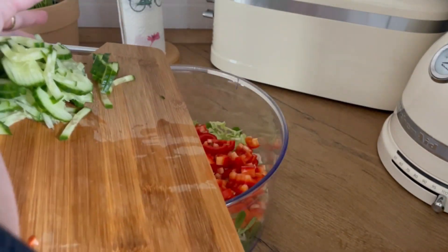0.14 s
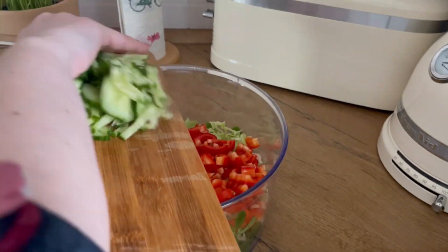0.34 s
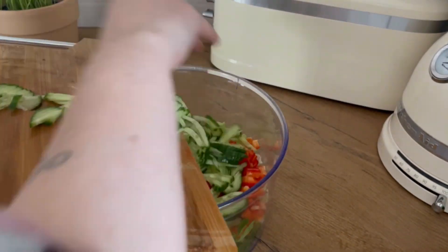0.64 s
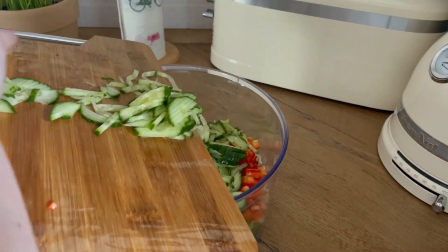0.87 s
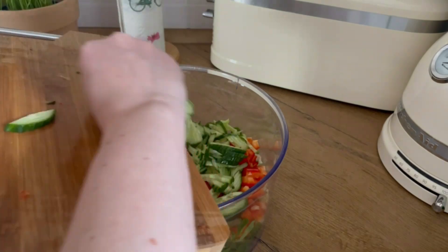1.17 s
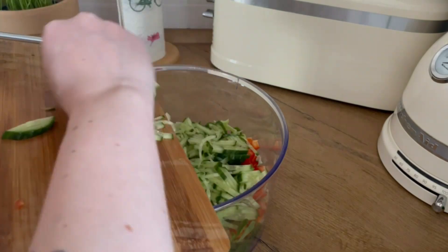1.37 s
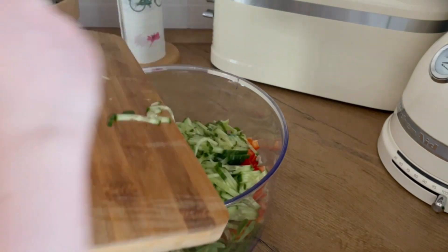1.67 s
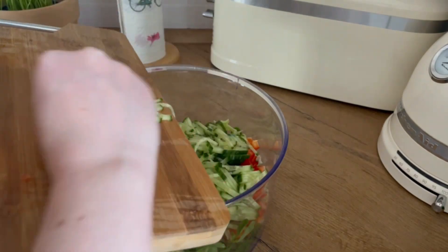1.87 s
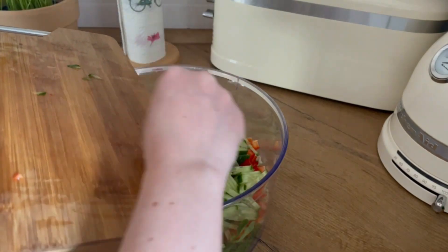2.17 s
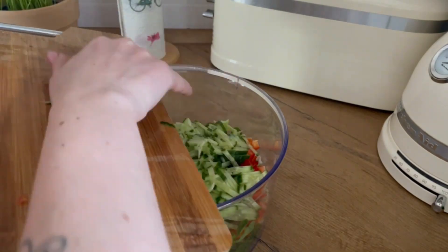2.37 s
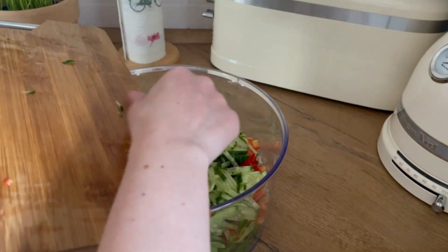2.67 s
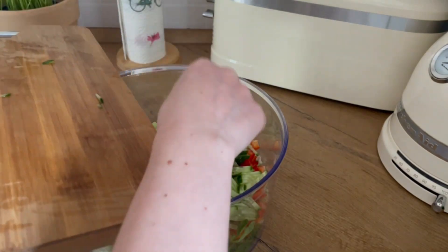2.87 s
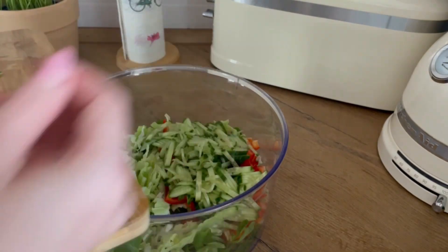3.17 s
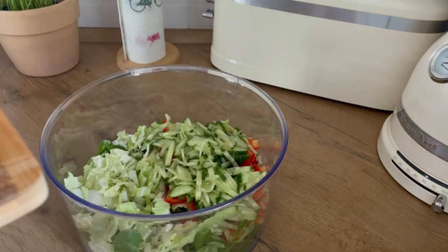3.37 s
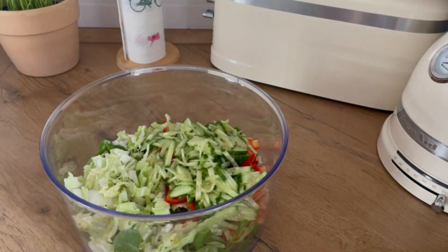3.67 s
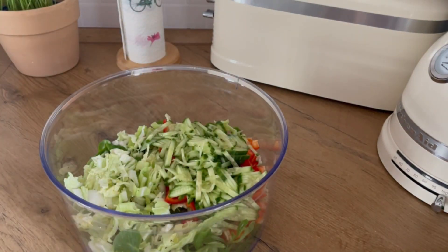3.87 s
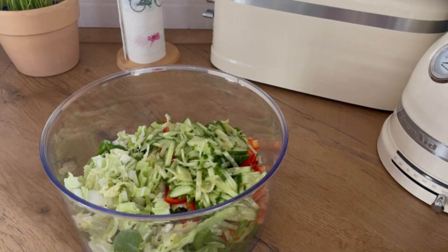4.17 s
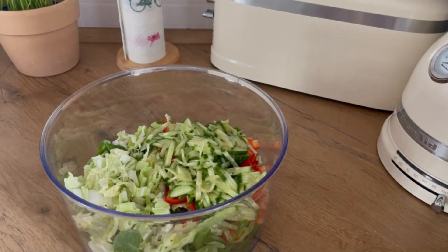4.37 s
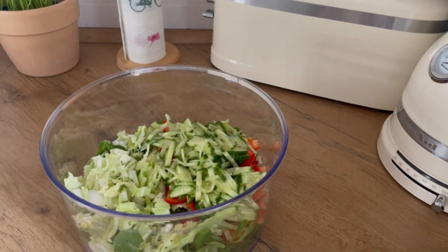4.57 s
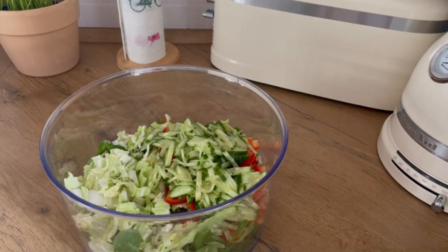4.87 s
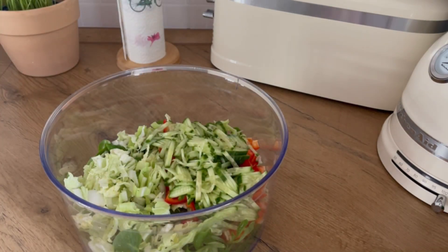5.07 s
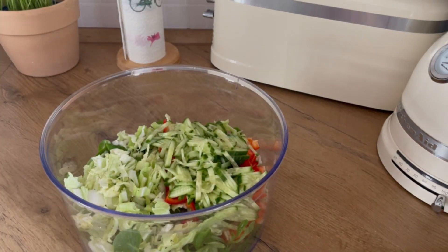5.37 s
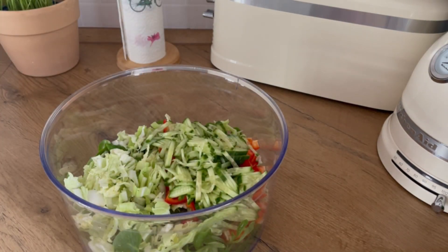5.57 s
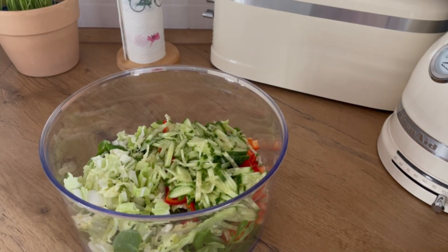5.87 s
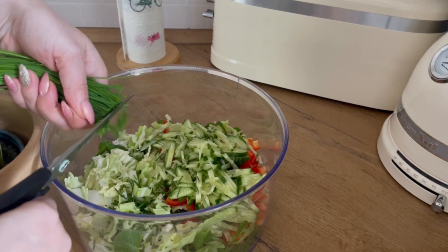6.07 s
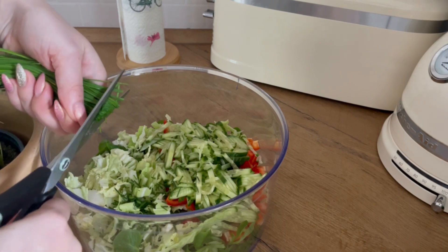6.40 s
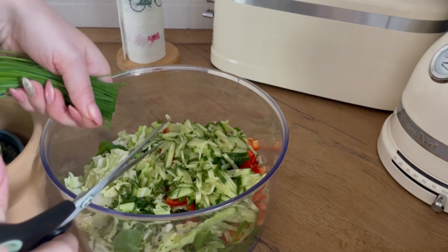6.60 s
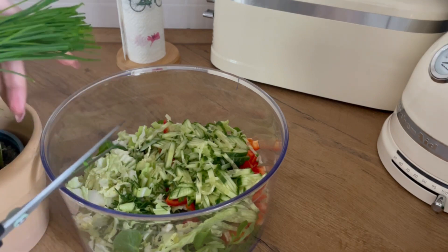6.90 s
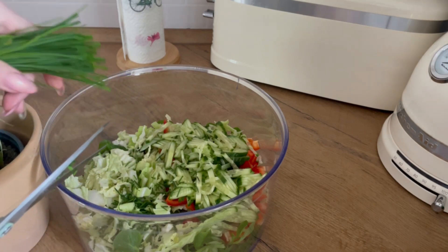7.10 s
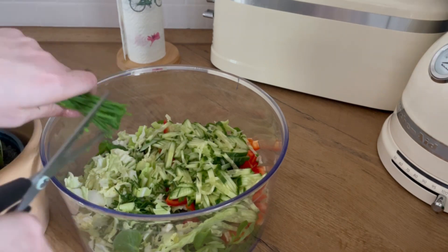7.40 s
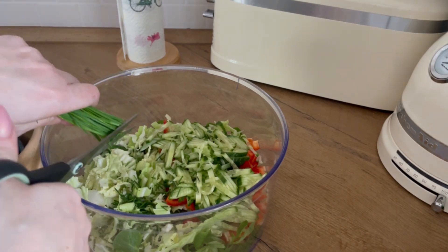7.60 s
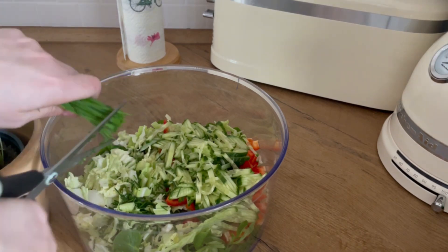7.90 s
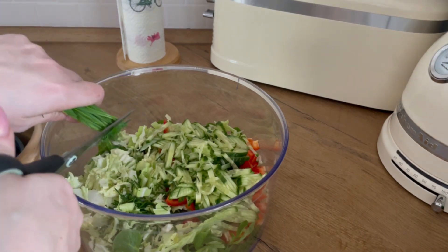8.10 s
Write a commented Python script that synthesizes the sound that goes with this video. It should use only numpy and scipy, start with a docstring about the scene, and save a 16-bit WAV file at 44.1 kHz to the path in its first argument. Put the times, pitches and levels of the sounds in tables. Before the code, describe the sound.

A quiet kitchen, miked closely with slight short reverberation, over soft room noise and a low, faintly wavering appliance hum. At 0 s a wooden board knocks on a plastic bowl, with a stronger hollow double knock near 0.35 s. Until about 2.2 s a hand scrapes over the board in uneven short, dry, raspy strokes with light taps; firmer swipes come at 1.75 and 2.15 s. Another clear knock sounds at 2.7 s, then faint rustles around 3.2-3.4 s. After a pause, the board lands at 4.6 s in a loud, rapid woody rattle, slides, tips at 4.8 s and settles by 5 s. Soft rustles follow. At 5.92 s an abrupt cut slightly changes the hum. Scissors snip chives at about 6.05, 6.47, 7.63 and 8.1 s: bright metallic touch, crisp crunch and snaps, then a reopening click with a tiny squeak. The bunch rustles very quietly between cuts.

```python
"""In a quiet kitchen with humming appliances, a hand scrapes chopped vegetables off a wooden board.
The board knocks on a plastic bowl and is put down on the counter; after an edit, scissors snip chives.
Scrapes, rustles and cuts are dense random slips; knocks and snaps are a click with a dying shower of contacts.
Both ring a filter shaped like the object. The background is shaped noise, steady tones and wavering whines."""
import sys
import numpy as np
from scipy import signal
from scipy.io import wavfile
from scipy.ndimage import uniform_filter1d

SR = 44100
rng = np.random.default_rng(int(sys.argv[2]) if len(sys.argv) > 2 else 0)


def store_wav(level_fs):
    """Save 16-bit WAV to argv[1]."""
    pcm = np.round(np.clip(np.atleast_2d(level_fs), -1, 1) * 32767)
    wavfile.write(sys.argv[1], SR, pcm.T.astype(np.int16))


N = 363825
EDIT_S = 5.921  # the second part of the scene starts here

# Room noise, one colour table for each part: (frequency [Hz], density [dB per Hz], relative)
AIR_COLOURS = [(18, -90), (30, -66), (81, -43), (95, -8.5), (117, -7), (148, -25), (243, -15.5),
               (359, -21.5), (443, -19), (874, -25.5), (1260, -28.5), (2240, -38.5), (2990, -42),
               (4910, -50), (15500, -54.5)], [(18, -82), (30, -35.5), (85, -31), (100, -9.5), (123, -5),
               (148, -19.5), (249, -8), (292, -23.5), (399, -11.5), (532, -21), (673, -17), (1080, -24),
               (1870, -29), (2300, -34.5), (15500, -57.5)]
# Loudness of the room noise: (first part [dB rms], second part [dB rms]), before the bass roll-off
AIR_LEVELS_DB = -63.5, -62.5
# Motor tones: (frequency [Hz], first part [dB rms], second part [dB rms], sign at the in-step moment [+1 or -1]),
# levels before the bass roll-off
MOTOR_TONES = [(118.94, -61, -61, 1), (115.36, -64, -120, -1), (135.5, -120, -66, -1),
               (120.8, -120, -72, 1)]
# Moments when every tone is at a positive or negative peak: (first part [s], second part [s])
IN_STEP_S = 3.4, 6.47
# Wavering whines: (frequency [Hz], first part [dB rms], second part [dB rms], rms wander [Hz]),
# levels before the bass roll-off
WHINES = [(169.7, -77, -72.5, 2.8), (198, -70.5, -70.5, 3.5), (239.6, -70, -72, 1.1),
          (405, -77, -81.5, 3.4), (450, -74, -74.5, 4.2), (1874, -120, -80, 2.7), (14326, -101, -120, 4)]

# Faint rustles of cloth or hands: (loudest at [s], rise [s], hold [s], fall [s], level [dB], brightness [dB])
RUSTLES = [(3.207, .08, 0.045, 0.098, -67, 4), (3.376, 0.14, 0, 0.14, -63.5, -4.5),
           (5.186, 0.01, 0.0032, 0.074, -63, 0), (5.41, .03, 0.085, .15, -82, 4.5),
           (5.846, 0.019, 0, .11, -68.5, -14), (8.015, .04, .02, .04, -70, -14)]
# Colour of the rustles: (frequency [Hz], density [dB per Hz], relative)
RUSTLE_COLOUR = [(590, -22), (1000, 1), (1370, -7), (1500, -9), (2040, -5), (3760, -7), (15000, -29)]
# Bands of the rustles: (low edge [Hz], high edge [Hz], level [dB],
# share of pressure [0-1], share of brightness [0-1], share of weight [0-1])
RUSTLE_BANDS = [(1800, 6600, -1, 0.98, 0, 0), (7000, 16000, -7.5, .9, 1, 0)]

# The scissor joint squeaks: (start [s], length [s], first pitch [Hz], last pitch [Hz], level [dB])
SQUEAKS = [(6.13, 0.024, 3900, 3700, -59.5), (6.132, .025, 2070, 1940, -63),
           (6.558, 0.024, 2930, 1510, -57), (7.707, .03, 3000, 1800, -66), (8.188, 0.034, 2980, 1780, -65)]
# Snips: (blades slide in [s], touch [s], bite [s], cut through [s], reopen [s],
# touch [dB], bite [dB], cut [dB], reopening [dB], brightness [dB])
SNIPS = [(5.959, 6.0227, 6.051, 6.074, 6.1235, -39, -53, -45, -58.5, 1),
         (6.4, 6.4557, 6.463, 6.492, 6.554, -44, -59, -45, -57, 4),
         (7.601, 7.6213, 7.638, 7.652, 7.6984, -39.5, -54, -46, -55, -4),
         (8.031, 8.0606, 8.092, 8.143, 8.1848, -40, -55, -53, -57, -2)]
# The bunch of chives rustles in the hand:
# (loudest at [s], rise [s], hold [s], fall [s], level [dB], brightness [dB])
CHIVES = [(6.306, 0.061, 0.011, 0.055, -75.5, 3.5), (6.356, 0.055, 0, 0.047, -73.5, 6),
          (6.611, .04, .045, .06, -67, -2), (6.679, 0.021, 0.0041, 0.22, -76, -7),
          (7.077, 0.028, 0.0098, .025, -75.5, 0.5), (7.197, .3, 0, .1, -84, 1),
          (7.289, 0.19, 0.05, 0.052, -77.5, 4), (7.4, .1, 0.0032, .1, -89, 6),
          (7.482, 0.048, .026, .15, -79, 1.5), (7.768, .02, 0, .06, -82, -5), (7.88, .2, 0, 0.23, -94, 5),
          (7.971, .005, 0.02, 0.027, -75.5, -1)]
# Stalks snap, with small ticks nearby: (time [s], loudest 4 ms [dB rms], treble tilt [dB per octave])
SNAPS = [(2.9667, -68, -10.5), (3.5049, -61, -6), (3.8237, -59, -12), (6.0514, -44, -3.5),
         (6.0559, -36.5, -4), (6.0704, -42.5, -5), (6.0736, -24, -1), (6.3001, -62, -9),
         (6.4742, -33.5, -2), (6.4854, -29.5, 1), (6.4906, -34.5, -4), (6.6782, -59, -5),
         (6.8663, -61.5, -4), (7.2774, -57, 1.5), (7.3033, -63, -5), (7.3193, -58, -4), (7.4814, -67, 0.5),
         (7.4939, -62, -1), (7.5058, -60, -1), (7.65, -38.5, -5), (7.7677, -58.5, -11), (7.9703, -59, -12),
         (8.0341, -57, -12.5), (8.091, -41, -1), (8.1054, -46.5, -6), (8.1199, -36.5, -5.5),
         (8.1394, -46, -5)]
# Colour of the cuts: (frequency [Hz], density [dB per Hz], relative)
CUT_COLOUR = [(290, -41), (500, -20.5), (935, -9.5), (1320, -11.5), (1830, -11.5), (1960, -10),
              (4600, -5.5), (7360, -2.5), (10500, 3.5), (12500, 5), (15500, 11.5)]
# Resonances of the blades: (frequency [Hz], width [Hz], height [dB])
BLADE_RINGS = [(2130, 100, -25), (3890, 100, -7.5), (4900, 1060, -3), (8740, 4000, -0.5),
               (12300, 2900, -10.5)]
# Slide, fizz and crunch of a cut: (low edge [Hz], high edge [Hz], level [dB],
# share of pressure [0-1], share of brightness [0-1], share of weight [0-1])
CUT_BANDS = [(3300, 6650, 0.5, 1, 0.2, 0), (6840, 13500, 1.5, 0.87, 0.9, 0), (900, 2570, -6, 0.68, 0, 1)]
# Swell of the blades touching: (rise [s], hold [s], fall [s])
TOUCH_SHAPE = 0.0017, 0.0011, 0.029
# Swell of the blades reopening: (rise [s], hold [s], fall [s])
REOPENING_SHAPE = 0.0034, 0.0087, 0.054

# The board lands, rattles and settles on the counter:
# (time [s], loudest 4 ms [dB rms], treble tilt [dB per octave], time to die by 60 dB [s], thud [dB])
LANDINGS = [(4.5895, -25.5, 1.5, 0.053, -5.5), (4.5925, -22.5, 0, 0.042, -2.5),
            (4.602, -32, 3.5, 0.037, 3.5), (4.6085, -24.5, 1, 0.059, 0.5), (4.6125, -25, 2, 0.025, -1),
            (4.621, -33, -4, 0.014, 0), (4.632, -41, -3, 0.026, -2), (4.6415, -30, -0.5, 0.034, -9.5),
            (4.646, -27, -1, 0.038, -1), (4.659, -36.5, -9, 0.037, -7), (4.699, -32, -1.5, 0.039, 3),
            (4.711, -43, -5.5, 0.037, 4), (4.8165, -33, 1.5, .025, 15), (4.9, -51.5, -2, 0.044, 5)]
# Colour of the board on the counter: (frequency [Hz], density [dB per Hz], relative)
LANDING_COLOUR = [(59, -40.5), (100, -6.5), (330, -1), (391, -14), (492, 0), (633, -14), (718, 1),
                  (1110, -3), (1370, -9.5), (1840, -6), (2370, -9.5), (3840, -13), (15000, -58.5)]
# Resonances of the board on the counter: (frequency [Hz], width [Hz], height [dB])
LANDING_RINGS = [(136, 11.4, 9.5), (249, 21.6, 10.5), (328, 22, 9.5), (434, 16, 7), (497, 29, 7),
                 (820, 76, -1), (1096, 87, 5), (1760, 170, -0.5), (1993, 100, 3.5), (2730, 54, 0),
                 (3085, 33, 9.5), (3810, 113, 2.5), (4530, 140, -5), (5110, 120, -7.5), (6320, 90, -0.5)]
# The board slides, tips over and slides to rest:
# (brightness [dB], weight [dB], pressure as a list of (time [s], level [dB]))
SLIDE = [ (-10, -10, [(4.62, -39), (4.662, -38), (4.68, -41)]), (2.5, 0, [(4.68, -44), (4.69, -40),
         (4.81, -52)]), (3.5, -1.5, [(4.815, -43), (4.839, -52), (4.877, -50.5), (4.913, -45.5),
         (5.009, -82)]), ]
# Colour of the sliding board: (frequency [Hz], density [dB per Hz], relative)
SLIDE_COLOUR = [(88, -30.5), (150, -5), (326, 1.5), (561, -6), (668, 2), (966, -16.5), (1110, -14.5),
                (1240, -14), (3280, -19.5), (15500, -42.5)]
# Scrape, hiss and rumble of the slide: (low edge [Hz], high edge [Hz], level [dB],
# share of pressure [0-1], share of brightness [0-1], share of weight [0-1])
SLIDE_BANDS = [(1082, 3960, 0.5, 0.97, 0, 0.037), (4570, 16000, -9.5, 0.91, 1, 0.012),
               (150, 990, 4.5, 0.74, 0, 0.99)]

# The board knocks on the bowl:
# (time [s], loudest 4 ms [dB rms], treble tilt [dB per octave], time to die by 60 dB [s], thud [dB])
KNOCKS = [(.004, -31, 3, 0.03, 16), (.334, -28.5, 3.5, 0.11, -15), (.3395, -17.7, 2.5, .02, -4),
          (.349, -32, 1.5, .02, -4), (.356, -34, 2.5, 0.047, 2), (.364, -28, 4, 0.07, 2),
          (.369, -29, 2.5, 0.04, 8), (.39, -51, 5, 0.04, -9), (.505, -43.5, -3.5, 0.08, -7),
          (.899, -46.5, -6, 0.048, 4), (1.09, -48.5, -8, 0.027, 5), (1.269, -53, -3.5, 0.036, -4),
          (2.299, -36.5, 4, 0.071, 19.5), (2.696, -25.5, 1.8, 0.04, 0.7), (5.892, -51, -1, .02, 4)]
# Colour of the knocks: (frequency [Hz], density [dB per Hz], relative)
KNOCK_COLOUR = [(71, -42.5), (120, -13.5), (220, 2.5), (292, -2.5), (387, -4.5), (981, -1.5), (1470, -13),
                (1910, -17), (2250, -22), (2980, -17.5), (3800, -31.5), (5690, -27.5), (15000, -56)]
# Resonances of the knocks: (frequency [Hz], width [Hz], height [dB])
KNOCK_RINGS = [(244.2, 38, 16.5), (416.5, 30, 2.5), (535, 38, 6.5), (710, 50, 3), (896, 130, 4.5),
               (1017, 30, 5.5), (1100, 58, -7.5), (1584, 60, 1.5), (1900, 200, 9), (2684, 80, -0.5),
               (2930, 140, 3), (3700, 120, 13), (4090, 99, 12)]

# Strokes over the board: (brightness [dB], weight [dB], pressure as a list of (time [s], level [dB]))
STROKES = [ (-1.5, 22, [(0.012, -53), (0.022, -57), (0.037, -53)]), (0, -0.5, [(0.044, -60), (0.088, -67),
           (0.165, -67.5), (0.238, -56), (0.308, -55), (0.328, -56)]), (2, 6.5, [(0.39, -58), (0.442, -60),
           (0.47, -59), (0.496, -61.5), (0.61, -61), (0.69, -74.5), (0.715, -84)]),
           (-8, -10.5, [(0.72, -83), (0.762, -56), (0.786, -68), (0.846, -67), (0.914, -68.5)]),
           (-1, 0.5, [(0.923, -51), (0.943, -63), (0.965, -54), (1.035, -55)]), (4, 4, [(1.04, -54),
           (1.111, -57), (1.207, -56), (1.243, -50.5), (1.257, -65)]), (-5.5, 7, [(1.26, -66), (1.294, -67),
           (1.312, -62), (1.39, -75.5)]), (-4, -9, [(1.4, -55), (1.426, -67), (1.46, -54), (1.476, -58.5),
           (1.51, -51.5), (1.6, -105)]), (-1.5, -6, [(1.751, -47.5), (1.771, -51.5), (1.805, -46),
           (1.841, -55), (1.865, -61)]), (4.5, -0.5, [(1.87, -57), (1.976, -55), (2.04, -99)]),
           (1.5, -12, [(2.13, -47), (2.14, -58), (2.165, -41.5), (2.177, -48.5), (2.213, -77),
           (2.27, -101)]), (-3.5, -6.5, [(2.38, -90), (2.43, -63), (2.496, -59), (2.56, -108)]),
           (-5, 8, [(2.63, -98), (2.646, -82), (2.674, -71), (2.69, -50)]), ]
# Colour of the strokes: (frequency [Hz], density [dB per Hz], relative)
STROKE_COLOUR = [(120, -34.5), (200, -4), (248, -3.5), (363, -12.5), (443, -9), (1220, -9.5), (1330, -11),
                 (2060, -16.5), (3800, -8), (4390, -10), (15000, -19.5)]
# Resonances of the scraped board: (frequency [Hz], width [Hz], height [dB])
STROKE_RINGS = [(242, 20, 5.5), (1350, 75, 7.5), (1630, 130, 4.5), (2750, 150, 7.5), (3123, 110, 11),
                (3775, 88, 6), (4200, 320, -3.5), (5180, 250, 4.5), (6430, 300, 3), (8040, 300, -3.5),
                (9600, 370, -3)]
# Rasp, hiss, fizz, woody body and rumble: (low edge [Hz], high edge [Hz], level [dB],
# share of pressure [0-1], share of brightness [0-1], share of weight [0-1])
STROKE_BANDS = [(2289, 4440, -1, 1, 0, 0.021), (4502, 7600, -3.5, 0.78, 0.68, 0.11),
                (7800, 14500, -5.5, 1, 1, 0.007), (1060, 2400, -2.5, 1, .2, 0.05),
                (150, 890, -4.5, .4, 0.034, 0.73)]
# A stroke lands or catches on the board:
# (time [s], loudest 4 ms [dB rms], treble tilt [dB per octave], time to die by 60 dB [s])
TAPS = [(0.0438, -39.5, 1.5, 0.026), (0.2857, -52, 3, 0.077), (0.7416, -58, -2, 0.047),
        (0.7607, -41.5, 1, 0.018), (0.9221, -30.5, 2.5, 0.032), (0.9642, -46.5, 0.5, 0.087),
        (1.041, -50.5, 2, 0.19), (1.2383, -48, -2.5, 0.072), (1.4, -40.5, 0.5, 0.024),
        (1.4633, -53, -2, 0.062), (1.512, -46, 3.5, 0.036), (1.5497, -59, 5, 0.032),
        (1.7507, -40.5, 1, 0.044), (2.1306, -41, 0, 0.041)]

USUAL_DB = -60  # a middling pressure
QUIET_DB = -30  # how far below its top a swell starts and ends
SLIDE_IN_RISE_S, SLIDE_IN_DB, SLIDE_IN_BRIGHT_DB = 0.012, -73, 3.5
TOUCH_HISS_DB, TOUCH_BRIGHT_DB, TOUCH_TILT_DB = -20, 5.5, -1.5  # hiss against the click
BITE_RISE_S, BITE_RISE_DB = 0.0086, -14  # the bite starts this far below its level
CRUNCH_FALL_S, CRUNCH_WEIGHT_DB = 0.021, 3
SETTLING_DB = -77  # cut stalks fall until the blades reopen
JOINT_CLICK_DB, JOINT_TILT_DB = 9, -5.5  # click against the scrape
REOPENING_BRIGHT_DB, REOPENING_WEIGHT_DB = -4.5, 4
SNAP_T60_S = 0.029


def amp(db):
    """Turns dB into a gain."""
    return 10 ** (np.asarray(db) / 20)


def evened(x):
    """Scales a signal to rms 1."""
    return x / np.sqrt(np.mean(x ** 2) + 1e-20)


def smooth_noise(count, width):
    """Random wandering, averaged over width samples and scaled to rms 1."""
    return evened(uniform_filter1d(rng.standard_normal(count), width))


def read(points, hz):
    """Reads a spectrum table at the frequencies hz, on a logarithmic pitch scale."""
    f, value = np.transpose(points)
    return np.interp(np.log(hz + 1), np.log(f + 1), value)


def add(mix, s, sound):
    """Mixes a sound in at s seconds."""
    part = mix[round(s * SR):][:len(sound)]
    part += sound[:len(part)]


def band(x, lo_hz, hi_hz):
    """Keeps the sound between two frequencies, at rms 1."""
    sos = signal.butter(2, [lo_hz, min(hi_hz, SR / 2.2)], "band", fs=SR, output="sos")
    return evened(signal.sosfilt(sos, x))


def drifting(x, drift_db):
    """The colour wanders in patches as the point of contact moves."""
    z = signal.stft(x, nperseg=256, noverlap=192)[2]
    patches = uniform_filter1d(rng.standard_normal(z.shape[::-1]).T, 5, 0)  # across pitch
    patches = evened(uniform_filter1d(patches, 25, 1))  # across time
    return signal.istft(z * amp(drift_db * patches), nperseg=256, noverlap=192)[1][:len(x)]


def body(colour, rings=(), tilt_db=0, thud_db=0, lag=0, size=8192):
    """Response of a struck object: broad colour with resonance peaks, energy 1; bass comes lag seconds late."""
    hz = np.fft.fftfreq(size, 1 / SR)
    f = np.abs(hz)
    tilt = tilt_db * np.log2(np.clip(f, 150, None) / 2000)
    thud = thud_db / (1 + (f / 500) ** 4)
    peaks = sum(amp(top_db) / (1 + (2 * (f - at) / width) ** 2) for at, width, top_db in rings)
    gain = amp(read(colour, f) + tilt + thud) * (1 + peaks)
    log_gain = np.log(np.maximum(gain, 1e-5 * gain.max()))
    # This phase makes the sound start at once and then die away
    phase = signal.hilbert(log_gain).imag
    # Bending waves in wood travel slower at low pitch
    phase = phase + 2 * np.pi * lag * 400 * np.log(1 + f / 400) * np.sign(hz)
    response = np.fft.ifft(np.exp(log_gain - 1j * phase)).real[:size // 2]
    return response / np.linalg.norm(response)


def uneven_rings(rings, changes_db):
    """Each place or stroke excites the resonances unevenly, so their heights change."""
    return [(hz, width, db + more) for (hz, width, db), more in zip(rings, changes_db)]


def swell(s, rise, hold, fall, db, bright_db, weight_db=0):
    """Pressure that rises to its top at s seconds, holds and falls."""
    rise, hold, fall = np.maximum([rise, hold, fall], 0.001)
    end = s + hold + fall
    pressure = [(s - rise, db + QUIET_DB), (s, db), (s + hold, db), (end, db + QUIET_DB)]
    return bright_db, weight_db, pressure


def friction(moves, colour, rings, bands, grain_db, lump_db, drift_db):
    """Dense slips of uneven size ring the object; each band has its own contacts and follows the pressure."""
    out = np.zeros(N)
    spots_db = drift_db * rng.standard_normal((len(moves), len(rings)))
    for (bright_db, weight_db, pressure), spot in zip(moves, spots_db):
        s, level_db = np.transpose(pressure)
        t = np.arange(s[0], s[-1] + 0.005, 1 / SR)
        response = body(colour, uneven_rings(rings, spot))
        # Pressure varies every few ms
        lumps = uniform_filter1d(rng.standard_normal(len(t)), 150)
        lumps = evened(uniform_filter1d(lumps, 150))
        edges = signal.windows.tukey(len(t), 0.002 * SR / len(t))  # 1 ms fades
        press_db = np.interp(t, s, level_db) - USUAL_DB
        for lo_hz, hi_hz, db, pressed, bright, heavy in bands:
            grains = np.minimum(rng.exponential(1, len(t)), 5)
            slips = rng.standard_normal(len(t)) * amp(grain_db * grains + lump_db * lumps)
            rung = signal.oaconvolve(slips, response)[:len(t)]
            band_db = USUAL_DB + db + pressed * press_db + bright * bright_db + heavy * weight_db
            add(out, s[0], band(drifting(rung, drift_db), lo_hz, hi_hz) * amp(band_db) * edges)
    return out


def blows(events, colour, rings, tail_db, spot_db, lag=0):
    """Each blow is one click and a dying shower of small contacts, ringing the object."""
    out = np.zeros(N)
    t = np.arange(SR // 5) / SR
    showers = rng.standard_normal((len(events), len(t)))
    spots_db = spot_db * rng.standard_normal((len(events), len(rings)))
    for (s, peak_db, tilt_db, t60, *thud_db), shower, spot in zip(events, showers, spots_db):
        onset = np.minimum(t / 0.00028, 1)
        drive = amp(tail_db - 60 * t / max(t60, 0.004)) * shower * onset
        drive[SR // 1200] = 1  # the main contact follows the first touch
        response = body(colour, uneven_rings(rings, spot), tilt_db, *thud_db, lag=lag)
        sound = signal.fftconvolve(drive, response)
        loudest = np.sqrt(uniform_filter1d(sound ** 2, 180).max())  # over 4 ms
        add(out, s, amp(peak_db) * sound / loudest)
    return out


def air(colour, db):
    """Room noise: random short-time spectra with faint drifting patches."""
    frames = N // 256 + 5
    hz = np.fft.rfftfreq(1024, 1 / SR)
    real, imaginary, patches = rng.standard_normal((frames, 513, 3)).T
    patches = uniform_filter1d(patches, 10, 0)  # across pitch
    patches = evened(uniform_filter1d(patches, 12, 1))  # across time
    z = (real + 1j * imaginary) * amp(read(colour, hz)[:, None] + patches)
    noise = signal.istft(z, nperseg=1024, noverlap=768)[1][:N]
    return amp(db) * evened(noise)


def appliances(part):
    """Steady motor tones that beat against each other, and thin whines that waver in pitch."""
    t = np.arange(N) / SR - IN_STEP_S[part]
    out = np.zeros(N)
    for hz, *db, sign in MOTOR_TONES:
        out += sign * amp(db[part]) * np.cos(2 * np.pi * hz * t)
    for hz, *db, width in WHINES:
        pitch = hz + width * smooth_noise(N, 4000)
        out += amp(db[part]) * np.cos(2 * np.pi * np.cumsum(pitch) / SR)
    return np.sqrt(2) * out  # a cosine of rms 1 peaks at the square root of 2


def background():
    """Room noise and appliances, switching to other levels and colours at the edit."""
    first, second = (air(AIR_COLOURS[part], AIR_LEVELS_DB[part]) + appliances(part) for part in (0, 1))
    return np.where(np.arange(N) < EDIT_S * SR, first, second)


def kitchen(x):
    """Short reverberation: sparse echoes of random sign, treble dying sooner."""
    echoes = np.zeros(SR // 2)
    at = np.arange(200, len(echoes) - 20, 20)
    echoes[at + rng.integers(0, 20, len(at))] = rng.choice([-1., 1.], len(at))
    hz, t, z = signal.stft(echoes, SR, nperseg=256)
    t60 = read([(200, 0.44), (2000, 0.13), (12000, 0.13)], hz)  # (frequency [Hz], time to die by 60 dB [s])
    tail = signal.istft(z * amp(-60 * t / t60[:, None]), SR, nperseg=256)[1]
    return signal.oaconvolve(x, tail / np.linalg.norm(tail))[:N]


def rustles():
    """Cloth or hands rub lightly: soft swells of random slips."""
    moves = [swell(*row) for row in RUSTLES]
    return friction(moves, RUSTLE_COLOUR, [], RUSTLE_BANDS, grain_db=1.5, lump_db=2.0, drift_db=3.0)


def squeaks():
    """The joint squeaks faintly as the blades reopen: short rough whistles that glide down."""
    out = np.zeros(N)
    for s, length, first_hz, last_hz, db in SQUEAKS:
        hz = np.geomspace(first_hz, last_hz, int(length * SR))
        rough = 1 + 0.35 * smooth_noise(4000, 120)[:len(hz)]
        whistle = np.sin(2 * np.pi * np.cumsum(hz) / SR)
        add(out, s, amp(db) * rough * np.hanning(len(hz)) * whistle)
    return out


def scissors():
    """Blades slide in, touch, crunch through the stalks and reopen with a click of the joint."""
    moves = [swell(*row) for row in CHIVES]
    clicks = list(SNAPS)
    for start, touch, bite, cut, reopen, touch_db, bite_db, cut_db, reopen_db, bright_db in SNIPS:
        moves.append(swell(start, SLIDE_IN_RISE_S, touch - start, SLIDE_IN_RISE_S,
                           SLIDE_IN_DB, SLIDE_IN_BRIGHT_DB))
        crunch = [(bite - BITE_RISE_S, bite_db + BITE_RISE_DB), (bite, bite_db), (cut, cut_db),
                  (cut + CRUNCH_FALL_S, SETTLING_DB), (reopen, SETTLING_DB)]
        moves.append((bright_db, CRUNCH_WEIGHT_DB, crunch))
        moves.append(swell(touch, *TOUCH_SHAPE, touch_db + TOUCH_HISS_DB, TOUCH_BRIGHT_DB))
        moves.append(swell(reopen + REOPENING_SHAPE[0], *REOPENING_SHAPE, reopen_db,
                           REOPENING_BRIGHT_DB, REOPENING_WEIGHT_DB))
        clicks.append((touch, touch_db, TOUCH_TILT_DB))
        clicks.append((reopen, reopen_db + JOINT_CLICK_DB, JOINT_TILT_DB))
    cuts = friction(moves, CUT_COLOUR, BLADE_RINGS, CUT_BANDS, grain_db=3.0, lump_db=1.8, drift_db=4.5)
    clicks = [(*row, SNAP_T60_S) for row in clicks]
    return cuts + blows(clicks, CUT_COLOUR, BLADE_RINGS, tail_db=-17.5, spot_db=9.0)


def putting_down():
    """The board strikes the counter in a rattle of blows and slides to rest by friction."""
    slide = friction(SLIDE, SLIDE_COLOUR, LANDING_RINGS, SLIDE_BANDS, grain_db=2.5, lump_db=0.6, drift_db=2.0)
    return slide + blows(LANDINGS, LANDING_COLOUR, LANDING_RINGS, tail_db=-16.5, spot_db=3.5, lag=0.00499)


def bowl_knocks():
    """The wooden board knocks on the plastic bowl and the blow rings, its bass arriving late."""
    return blows(KNOCKS, KNOCK_COLOUR, KNOCK_RINGS, tail_db=-17.0, spot_db=3.0, lag=0.00692)


def scraping():
    """Strokes rub over the wooden board, with a small blow where one lands or catches."""
    rubs = friction(STROKES, STROKE_COLOUR, STROKE_RINGS, STROKE_BANDS, grain_db=1.0, lump_db=2.0, drift_db=2.5)
    return rubs + blows(TAPS, STROKE_COLOUR, STROKE_RINGS, tail_db=-16, spot_db=-1.0)


def scene():
    """Board, scissors and rustles with their reverberation, over the background of each part."""
    near = rustles() + squeaks() + scissors() + putting_down() + bowl_knocks() + scraping()
    return (background() + near + amp(-16) * kitchen(near))[None]


def record(dry):
    """The edit leaves a short silence and fades the second part in; bass and top treble are cut."""
    after = np.arange(N) / SR - EDIT_S
    fade = np.where(after < 0, 1, np.clip((after - 0.004) / 0.024, 0, 1))
    thin = signal.sosfilt(signal.butter(3, 90, "high", fs=SR, output="sos"), dry)
    treble_cut = signal.firwin(511, 15750, window=("kaiser", 9), fs=SR)  # cutoff in Hz
    return signal.oaconvolve(thin * fade, treble_cut[None], "same")


dry = scene()
out = record(dry)
store_wav(out)
```